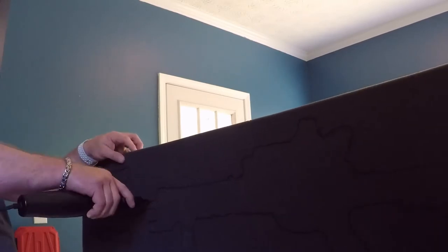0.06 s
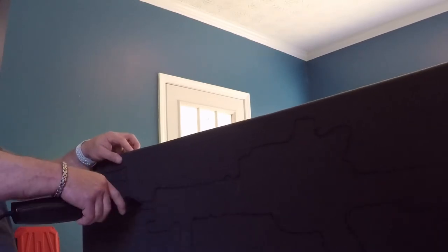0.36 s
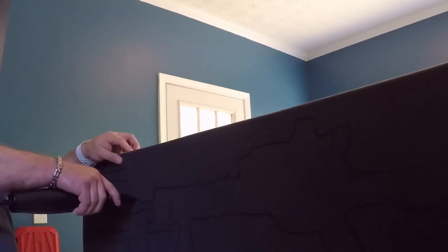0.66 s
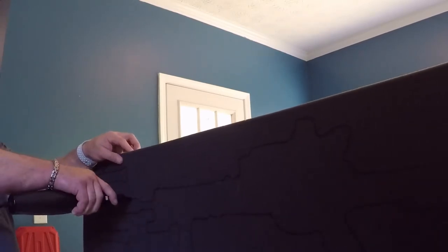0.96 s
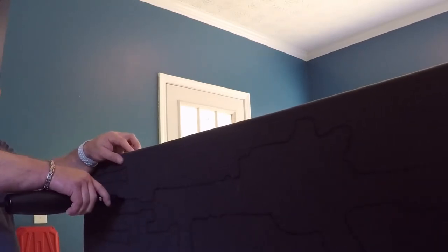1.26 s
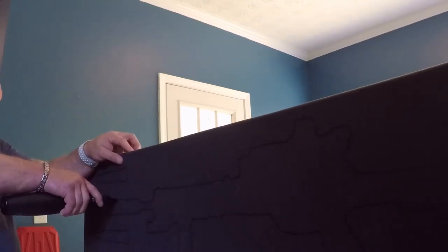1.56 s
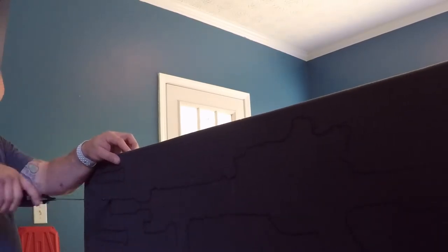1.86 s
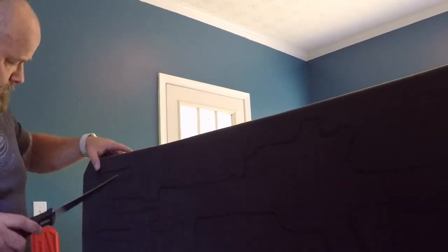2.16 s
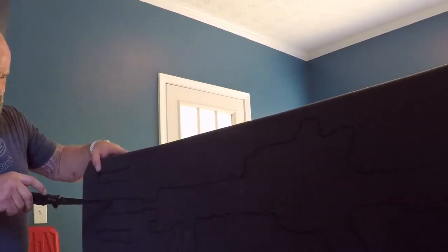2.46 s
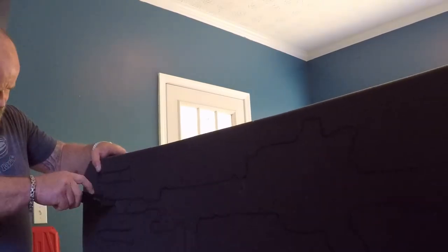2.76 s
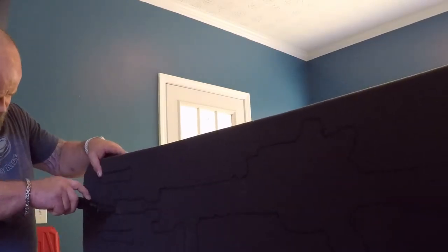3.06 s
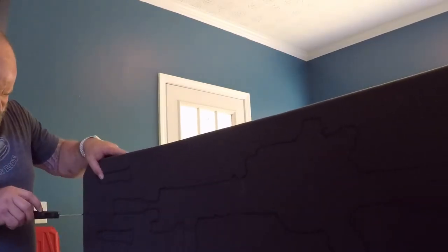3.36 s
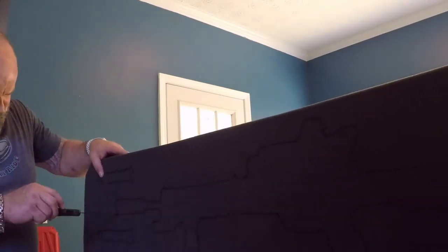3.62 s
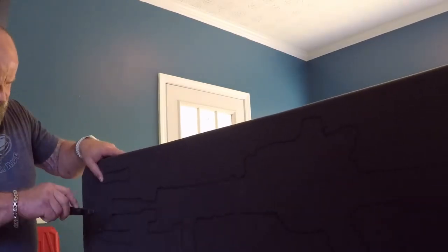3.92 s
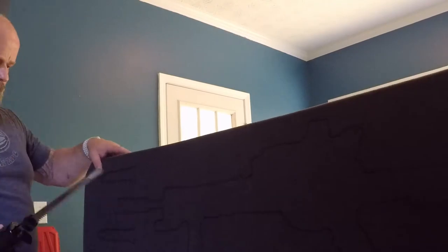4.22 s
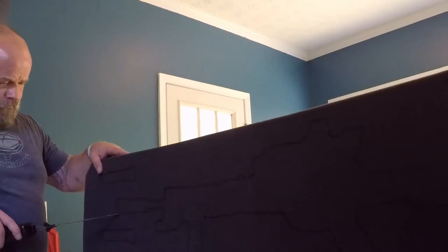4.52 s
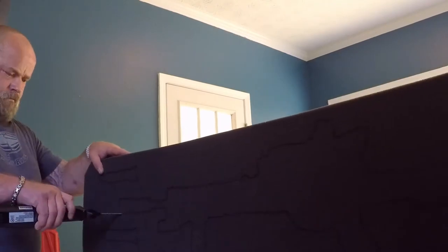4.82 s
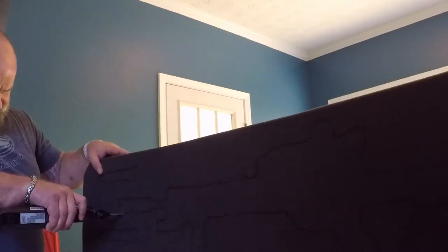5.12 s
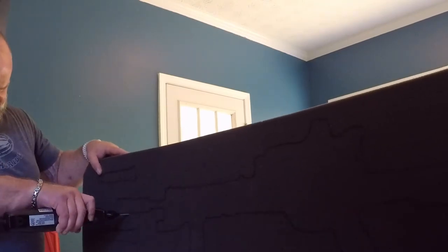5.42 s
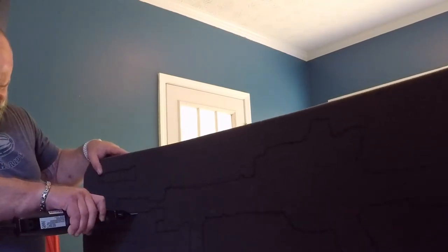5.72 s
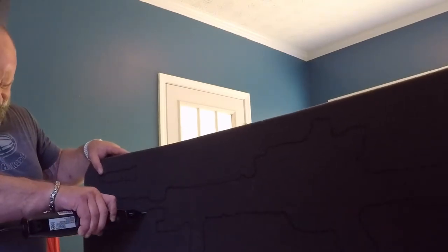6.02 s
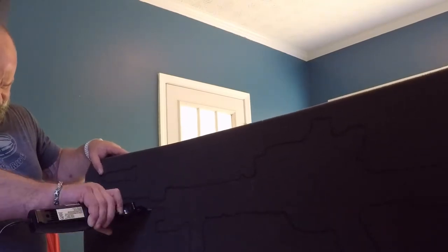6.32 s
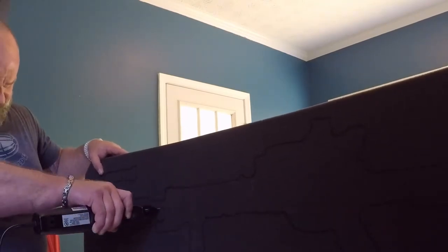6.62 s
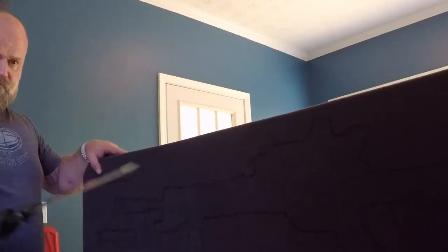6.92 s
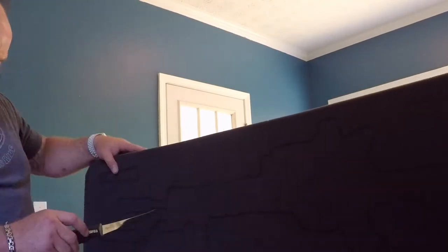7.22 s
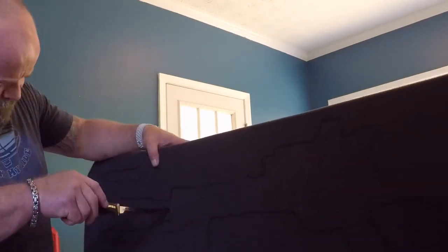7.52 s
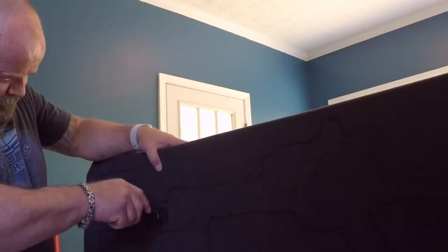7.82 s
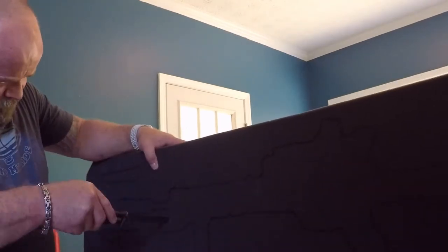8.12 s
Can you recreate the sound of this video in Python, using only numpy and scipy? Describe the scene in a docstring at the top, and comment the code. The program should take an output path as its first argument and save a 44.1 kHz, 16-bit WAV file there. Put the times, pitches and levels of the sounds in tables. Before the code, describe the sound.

In a small room, an electric carving knife hums and hisses through a foam slab, then is put down with a plastic clatter. A hand blade swishes through the foam several times and clacks against something hard. After a brief rustle the electric knife runs again and clatters down, followed by a few more hand strokes. The cutting sits mostly to the right, over a faint steady whine and hiss.

```python
"""An electric carving knife saws a foam slab in two runs and is put down with a clatter after each. Its motor
hums in harmonics of its speed, its serrated blades hiss, and its housing rings when it lands. Between the runs
and after them a hand blade swishes through the foam, tearing its cells; once it clacks against something hard
and bounces, and a dull wash of noise follows. Handling adds dull bumps. A thin steady whine and a hiss fill the
small room."""
import sys
import numpy as np
from scipy import signal
from scipy.fft import rfft, irfft
from scipy.io import wavfile
from scipy.ndimage import uniform_filter1d

SR = 44100
rng = np.random.default_rng(int(sys.argv[2]) if len(sys.argv) > 2 else 0)


def dump_mix(stems):
    """Bounce the given channels to the path in sys.argv[1] as a 16-bit WAV at rate SR."""
    frames = np.atleast_2d(stems).T  # one column per channel
    limited = np.clip(frames, -1, 1)  # hard clip at full scale
    pcm = np.round(limited * 32767).astype(np.int16)
    wavfile.write(sys.argv[1], SR, pcm)


N = 369512
T = np.arange(N) / SR
HZ = np.fft.rfftfreq(N, 1 / SR)
TREBLE_HZ, MIDDLE_HZ, WHOLE_HZ = (3000, 15000), (1250, 1800), (20, 16000)

# Levels in all tables are relative: each source applies its own gain.
# cuts with the electric knife: start_s, stop_s, hiss_db, rattle_db
CUTS = [(0, 1.921, -22.5, -37), (4.872, 6.958, -23, -36)]
# the motor under power, one curve a cut: time_s, pitch_hz, first_db, second_db, third_db, higher_db
MOTOR_CURVES = [
    [(0, 390.5, -26.5, -24.5, -38, -41), (.11, 382.8, -23, -30.5, -33, -34),
     (.21, 379.8, -21.5, -34, -28, -34), (.31, 381.5, -14.5, -27.5, -27, -39),
     (.545, 385.6, -15, -26.5, -35.5, -37.5), (.58, 385.5, -29, -33, -33, -36.5),
     (.8, 387.3, -28.5, -25.5, -46, -41), (1.15, 386.4, -28.5, -29, -37.5, -43),
     (1.22, 389.5, -17.5, -26.5, -23.5, -40), (1.27, 383.7, -34, -30.5, -36, -44),
     (1.6, 383, -28.5, -28, -35.5, -41), (1.76, 389, -29.5, -24, -30, -39),
     (1.93, 396.4, -35, -25.5, -28, -40)],
    [(4.87, 400, -29.5, -43, -37, -34), (5.02, 400.8, -30.5, -32, -32, -44),
     (5.08, 392.3, -19, -31, -33, -38), (5.2, 390.8, -18, -27.5, -38, -54),
     (5.43, 382, -15, -42.5, -28, -45), (5.86, 381.6, -21.5, -34, -26.5, -43),
     (6.05, 388.2, -23, -26, -29, -42), (6.24, 392.5, -21.5, -30, -25.5, -47),
     (6.33, 403, -22, -35.5, -40, -55), (6.79, 403.4, -21.5, -30.5, -34, -58),
     (6.86, 404.6, -27.5, -35, -33, -59), (6.895, 410.5, -29, -18, -34, -60),
     (6.95, 479.5, -25, -24, -41, -61)],
]
# partials of the whine: pitch_hz, level_db
WHINE_PARTIALS = [(958.2, -58.5), (1055, -55.5), (1152, -53.5), (1346, -52.5), (1443, -52.5), (1825, -59),
                  (1922, -47.5), (2019, -55.5)]
# modes of a steel blade: pitch_hz, level_db, t60_s
STEEL_MODES = [(450, -25, 0.11), (1130, -19, 0.039), (1250, -9.5, 0.048), (1830, -18, 0.075),
               (2100, -24, .02), (2290, 3.5, 0.016), (2445, -10, 0.053), (2800, -16, 0.017),
               (3240, -16, 0.018), (4560, -14, 0.024), (5700, -8.5, 0.015), (6150, -10, .012)]
# standing waves of the room: pitch_hz, level_db, t60_s
ROOM_MODES = [(113.3, 13.5, 0.52), (196, 15, 0.82), (480, 3, 0.97), (570, -21.5, .35), (760, -14, 0.41),
              (867, -20, .5), (1055, 11, 1), (1325, 7, .5)]


def amp(db):
    """Decibels to amplitude ratio."""
    return 10 ** (np.asarray(db) / 20)


def spectrum(points, hz=HZ):
    """Interpolation of (frequency_hz, value) rows on a log-frequency axis."""
    frequency_hz, value = np.transpose(points)
    return np.interp(np.log(hz + 1), np.log(frequency_hz + 1), value)


def envelope(curves, column=1):
    """Smoothed amplitude envelope from one dB column of several curves, silent outside them."""
    levels_db = [np.interp(T, c[:, 0], c[:, column], left=-200, right=-200) for c in map(np.array, curves)]
    return uniform_filter1d(sum(map(amp, levels_db)), 256)


def swells(events, drop_db=13, roundness=1.42):
    """Envelope of rounded swells, each drop_db down one rise before and one fall after its peak."""
    return sum(amp(db - drop_db * np.maximum((peak_s - T) / rise_s, (T - peak_s) / fall_s) ** roundness)
               for peak_s, db, rise_s, fall_s in events)


def gate(start_s, stop_s, linger_s, linger_db, fade_db_per_s, attack_s=0.0074):
    """Envelope that holds until the stop, moves by linger_db, then decays exponentially."""
    after_s = np.maximum(T - stop_s, 0)
    slope_db = linger_db * np.minimum(after_s / linger_s, 1)
    fade_db = fade_db_per_s * np.maximum(after_s - linger_s, 0)
    return np.clip(1 + (T - start_s) / attack_s, 0, 1) * amp(slope_db - fade_db)


def add(mix, start_s, sound):
    """Superposition of a sound on the mix, in place."""
    part = mix[..., round(start_s * SR):][..., :sound.shape[-1]]
    part += sound[..., :part.shape[-1]]


def drift(cutoff_hz):
    """Low-pass random fluctuation of unit variance."""
    wander = irfft(rfft(rng.standard_normal(N)) / (1 + (HZ / cutoff_hz) ** 4), N)
    return wander / wander.std()


def sides(left_minus_right_db):
    """Left and right gains for an interaural level difference."""
    gains = amp(np.array([[.5], [-.5]]) * left_minus_right_db)
    return gains / gains.mean(0)


def noise(colour_db, pan_db, band_hz, left_lag_s=.0001):
    """Partly coherent stereo noise; the mean of its channels has unit RMS inside the band."""
    # likeness of the sound at the two ears: frequency_hz, coherence
    ear_coherence = [(30, .05), (120, 0.59), (400, 0.74), (900, 0.3), (1500, 0.96), (2500, 0.045),
                     (7000, 0.027), (15000, 0.059)]
    coherence = spectrum(ear_coherence)
    common, separate = rfft(rng.standard_normal((2, N)))
    left = common * np.exp(-2j * np.pi * HZ * left_lag_s)
    right = coherence * common + np.sqrt(1 - coherence ** 2) * separate
    shaped = np.array([left, right]) * amp(colour_db) * sides(pan_db)
    in_band = shaped.mean(0) * (HZ > band_hz[0]) * (HZ < band_hz[1])
    return irfft(shaped, N) / irfft(in_band, N).std()


def tone(hz, waver_db, wander_rad):
    """A sinusoid near unit RMS with random amplitude and phase modulation."""
    return amp(waver_db * drift(11)) * np.sqrt(2) * np.sin(2 * np.pi * hz * T + wander_rad * drift(9.1))


def ring(modes, t, pitch_ratio=1):
    """Free vibration as a sum of damped modes."""
    return sum(amp(db - 60 * t / t60) * np.sin(2 * np.pi * hz * pitch_ratio * t) for hz, db, t60 in modes)


def motor_speed(coast_s=.115):
    """Inertia: the share of running speed falls and recovers exponentially as the trigger is worked."""
    # releases of the trigger: release_s, press_s, spin_up_s (a time constant)
    releases = [(1.752, 1.797, 0.046), (1.896, 4.85, .036), (4.993, 5.048, 0.025), (5.888, 5.928, 0.031),
                (6.867, 6.885, .03), (6.95, 8.5, .03)]
    speed = np.ones(N)
    for release_s, press_s, spin_up_s in releases:
        lost = 1 - np.exp(-np.clip(T - release_s, 0, press_s - release_s) / coast_s)
        speed *= 1 - lost * np.exp(-np.maximum(T - press_s, 0) / spin_up_s)
    return speed


def motor_cycles(speed, wobble=0.0031, stumble=.18):
    """Phase is the integral of frequency, which jitters more as the motor slows."""
    time_s, pitch_hz, *_ = np.vstack(MOTOR_CURVES).T
    jitter = wobble * drift(37.5) + stumble * (1 - speed) * drift(114)
    return np.cumsum(np.interp(T, time_s, pitch_hz) * speed * (1 + jitter)) / SR


def motor_hum(cycles, speed, stall_db=-10.5, drop_half_width_s=0.024):
    """Periodic motion gives a harmonic series; in a stall it flutters and fades, upper partials most."""
    # brief drops of the fundamental: time_s, depth_db
    drops = [(.045, 10), (.59, 5), (.82, 9), (1.305, 11), (5.951, 10), (6.26, 4.5)]
    # higher partials: harmonic_number, offset_db from higher_db
    overtones = [(4, 1), (5, -1), (6, -19.5)]
    drop_db = sum(depth_db * np.exp(-((T - s) / drop_half_width_s) ** 2) for s, depth_db in drops)
    flutter_db = 0.74 + 5 * (1 - speed) * speed
    hum = np.zeros((2, N))
    for k, offset_db in [(1, -drop_db), (2, -1.5), (3, -0.4), *overtones]:
        gain = np.sqrt(2) * envelope(MOTOR_CURVES, column=min(k + 1, 5)) * amp(offset_db)
        ear_phase = np.array([[-.5], [.5]]) * (0.21 + 0.36 * (k - 1) * drift(4.2))
        unsteady_db = flutter_db * np.sqrt(k) * drift(51) + 0.9 * drift(11)
        fade_db = stall_db * np.sqrt(k) * (1 - speed)
        phase = 2 * np.pi * (k * cycles + rng.random())
        hum += gain * amp(unsteady_db + fade_db) * np.cos(phase + ear_phase)
    return hum


def gears(cycles, speed, wander_rad=.8, pan_db=-3):
    """Fixed gear ratios lock side tones to the motor; phase noise broadens them."""
    # swelling tones of the drive: peak_s, level_db, rise_s, fall_s, motor_ratio
    gear_tones = [(.75, -46, 0.59, 0.8, 8.39), (6.6, -45.5, .4, .35, 8.34), (6.65, -33, 0.53, 0.3, 1.5)]
    tones = sum(swells([swell]) * np.sqrt(2) * np.cos(2 * np.pi * ratio * cycles + wander_rad * drift(50))
                for *swell, ratio in gear_tones)
    return tones * speed ** 2 * sides(pan_db)


def serrated_blades(cycles, pulse_depth=0.095, grain_db=0.5):
    """Amplitude modulation: blade hiss and housing rattle pulse twice a cycle; blade resonances sing."""
    # spectrum of the sawing hiss: frequency_hz, level_db
    hiss_colour = [(1180, -51.5), (2000, -9.5), (2050, -4), (2950, -3), (3270, -1.5), (4510, -3),
                   (7910, 0.5), (9990, -0.5), (14200, 1.5), (15800, 0.5)]
    # spectrum of the housing rattle: frequency_hz, level_db
    rattle_colour = [(20, 0.5), (70, 0), (130, 1.5), (200, 5.5), (330, 4), (480, 5), (590, 3.5), (850, 4),
                     (1100, 2.5), (1400, 0.5), (1900, -0.5), (2600, -10.5), (5000, -33)]
    # balance of hiss and rattle: frequency_hz, left_minus_right_db
    balance = [(60, -10), (110, -13), (200, 0), (380, -10.5), (700, -2), (1290, -8), (2380, -12.5),
               (4400, -9), (8120, -6.5), (15000, -3.5)]
    # resonances of the blades: centre_hz, width_hz, level_db
    resonances = [(3475, 25, -15), (6880, 54, 4), (7690, 53, 7.5), (10400, 45, -11), (11060, 55, 6.5),
                  (14500, 81, -10)]
    # singing of the freely running blades: time_s, level_db
    singing = [(4.9, -49), (5.3, -37), (5.42, -31), (5.85, -34), (6.1, -39), (6.35, -40), (6.9, -37)]
    hiss_gain, rattle_gain = np.zeros((2, N))
    for start_s, stop_s, hiss_db, rattle_db in CUTS:
        running = gate(start_s, stop_s, linger_s=0.14, linger_db=-6, fade_db_per_s=238)
        hiss_gain += running * amp(hiss_db - 0.51)
        rattle_gain += running * amp(rattle_db - 1)
    teeth = (1 + pulse_depth * np.cos(4 * np.pi * cycles)) * amp(grain_db * drift(300))
    pan_db = spectrum(balance)
    hiss = noise(spectrum(hiss_colour), pan_db, TREBLE_HZ) * hiss_gain
    rattle = noise(spectrum(rattle_colour), pan_db, MIDDLE_HZ) * rattle_gain * amp(1.67 * drift(55))
    power = sum(amp(db) ** 2 / width / (1 + (2 * (HZ - hz) / width) ** 2) ** 2
                for hz, width, db in resonances)
    song = noise(10 * np.log10(power), 0, WHOLE_HZ) * envelope([singing])
    return teeth * (near_reflections(hiss) + rattle) + song


def near_reflections(direct, delays_s=(.0007, .007), sway_s=.00005, echo_gain=0.13, count=7):
    """Comb filtering: short echoes interfere with the direct sound and shift as the hand moves."""
    mix = direct.copy()
    for delay_s in np.geomspace(*delays_s, count) * rng.uniform(.85, 1.15, count):
        delayed = np.round((T - delay_s - sway_s * drift(1.2)) * SR).astype(int)
        mix += echo_gain * direct[:, delayed % N]
    return mix / np.sqrt(1 + count * echo_gain ** 2)


def drone(level_db=-39.5):
    """Modulated tones: the lowest whine partial swells after each cut; the lowest room mode thrums."""
    # low thrum that builds through the second cut: time_s, level_db
    thrum_curve = [(4.9, -67), (6.2, -61), (6.6, -44.5), (7.0, -45), (7.2, -40.5), (7.5, -69.5)]
    running = sum(gate(start_s, stop_s, linger_s=.27, linger_db=6.5, fade_db_per_s=99)
                  for start_s, stop_s, *_ in CUTS)
    high = running * amp(level_db) * tone(WHINE_PARTIALS[0][0], waver_db=2.2, wander_rad=0.71)
    thrum = envelope([thrum_curve]) * tone(ROOM_MODES[0][0], waver_db=2.5, wander_rad=0.29)
    return high + thrum


def background(air_db=-48.5, whine_db=-2.5, lift_db=5, sink_s=0.037, crossover_hz=2200, low_share=0.54):
    """A line spectrum whines over broadband hiss; both dip under loud sounds, the treble most."""
    # dips of the background: start_s, end_s, depth_db, recovery_s
    dips = [(0, 2.1, 13, 0.067), (4.165, 4.22, 19, 0.32), (4.867, 7.1, 22, .07)]
    # spectrum of the hiss: frequency_hz, level_db
    air_colour = [(25, -16.5), (150, -7.5), (300, -12), (550, -8), (860, -16), (980, -8), (1120, 11),
                  (1400, 10.5), (1650, 4), (1950, 2), (2300, -0.5), (4500, -0.5), (7000, 0), (15500, -2)]
    # balance of the hiss: frequency_hz, left_minus_right_db
    balance = [(100, -9), (800, -9.5), (1100, 1), (2000, 6.5), (3000, -5.5), (8000, -1.5), (15000, -2.5)]
    # softening of the whine: time_s, level_db
    whine_fade = [(4.8, -2), (7.3, -3.5)]
    gain_db = lift_db
    for start_s, end_s, depth_db, recovery_s in dips:
        sinking, recovering = (T - start_s) / sink_s, 1 - (T - end_s) / recovery_s
        gain_db -= depth_db * np.clip(np.minimum(sinking, recovering), 0, 1)
    air = noise(spectrum(air_colour), spectrum(balance), TREBLE_HZ) * amp(air_db)
    low = irfft(rfft(air) / (1 + (HZ / crossover_hz) ** 8), N)
    whine = sum(amp(db) * tone(hz, waver_db=1.3, wander_rad=0.8) for hz, db in WHINE_PARTIALS)
    whine *= amp(whine_db + np.interp(T, *np.transpose(whine_fade)))
    return (air - low) * amp(gain_db) + (low + whine) * amp(low_share * gain_db)


def housing_knocks(rise_s=0.001, crack_t60_s=0.047, steel_db=-10, low_cut_hz=290):
    """Impacts excite the modes of the plastic housing; hard ones also crack and shake the blades."""
    # blows as the knife is put down: start_s, level_db, pitch_ratio, crack_db
    blows = [(1.9, -14, 1.01, -22), (2.02, -13, 0.66, -17), (2.049, -1.5, 0.97, -17),
             (2.0554, -10, 0.85, -28), (2.0713, -7, 1.16, 1.5), (2.075, -19, 0.75, -1),
             (2.1116, -10, 0.67, -5.5), (2.122, -13, 0.6, -2), (6.929, -9.5, 1.15, -5.5),
             (6.940, -10, 1.23, -8), (7.036, -4, 0.89, -29), (7.049, -12.5, 0.73, -20),
             (7.065, -8.5, 1.14, -18), (7.079, -9.5, 0.93, -11), (7.088, -12.5, 0.56, 3.5),
             (7.094, -9.5, 0.6, 5), (7.099, -10, 0.61, -7), (7.113, -11, 0.75, -18)]
    # modes of the housing: pitch_hz, level_db, t60_s
    housing_modes = [(476, -13.5, 0.053), (545, -9, 0.094), (620, -7.5, 0.02), (813, 1, 0.026),
                     (896, -7.5, 0.033), (1073, -19, 0.059)]
    mix, t = np.zeros((2, N)), np.arange(SR // 4) / SR
    crack_band = signal.butter(1, [1800, 6500], "bandpass", fs=SR)
    for start_s, db, pitch_ratio, crack_db in blows:
        crack = 0.52 * signal.lfilter(*crack_band, rng.standard_normal((2, len(t))))
        bright = crack * amp(-60 * t / crack_t60_s) + amp(steel_db) * ring(STEEL_MODES, t)
        blow = ring(housing_modes, t, pitch_ratio) + amp(crack_db) * bright
        add(mix, start_s, amp(db) * blow * (1 - np.exp(-t / rise_s)))
    return signal.lfilter(*signal.butter(2, low_cut_hz, "highpass", fs=SR), mix) * sides(2.1)


def room(direct, tail_db=-14, modes_db=-20, build_s=0.0094):
    """Reverberation: a diffuse tail loses its treble first, while a few standing waves ring on."""
    # reverberation time of the room: frequency_hz, t60_s
    decay_times = [(100, 1), (500, 0.7), (1100, 0.83), (1800, 0.23), (8000, 0.18)]
    t = T[:SR]
    hz, frame_s, frames = signal.stft(rng.standard_normal((2, SR)), SR, nperseg=256)
    decay = amp(-60 * frame_s / spectrum(decay_times, hz)[:, None])
    tail = signal.istft(frames * decay, SR, nperseg=256)[1][:, :SR]
    tail = (tail + .5 * tail[::-1]) * (1 - np.exp(-t / build_s))  # each ear shares some of the other
    standing = ring(ROOM_MODES, t)
    response = amp(tail_db) * tail / np.linalg.norm(tail[0])
    response += amp(modes_db) * standing / np.linalg.norm(standing)
    return signal.fftconvolve(direct, response, axes=1)[:, :N]


def handling(rise_s=0.0027):
    """Soft contacts give mostly low frequencies: unpitched thuds; after the clack a dull wash of noise swells
    and fades."""
    # bumps of handling: start_s, level_db, t60_s
    bumps = [(1.965, -26, 0.18), (1.989, -20.5, 0.13), (2.19, -27, 0.14), (2.206, -29, 0.48),
             (4.262, -42, 0.26), (5.174, -22, 0.081), (7.125, -37, 0.99)]
    # spectrum of a bump: frequency_hz, level_db
    bump_colour = [(30, -38), (65, -16), (100, 2), (140, 3.5), (210, 1.5), (500, -3), (1200, -19),
                   (3000, -34), (16000, -66)]
    # a dull wash of noise after the clack, then a fainter swell: peak_s, level_db, rise_s, fall_s
    rustles = [(4.285, -40, 0.13, 0.16), (4.665, -49, 0.11, 0.11)]
    # spectrum of a rustle: frequency_hz, level_db
    rustle_colour = [(30, -17), (120, -1.5), (300, -1.5), (700, -4.5), (1500, -4), (2400, -10.5),
                     (4000, -16.5), (16000, -38)]
    force, t = np.zeros(N), T[:SR]
    for start_s, db, t60_s in bumps:
        add(force, start_s, amp(db - 60 * t / t60_s) * (1 - np.exp(-t / rise_s)))
    thuds = force * noise(spectrum(bump_colour), 0, WHOLE_HZ)
    return thuds + swells(rustles) * noise(spectrum(rustle_colour), 0, WHOLE_HZ)


def hand_blade(gain_db=-1, grain_db=1.0):
    """Many tiny ruptures of foam cells merge into a broadband swish."""
    # strokes through the foam: peak_s, level_db, rise_s, fall_s
    strokes = [(2.8, -37, 0.19, 0.052), (2.99, -37.5, 0.064, 0.021), (3.12, -35.5, 0.1, 0.057),
               (3.24, -33, 0.022, 0.095), (3.755, -32.5, .13, 0.042), (3.995, -33, 0.072, 0.044),
               (7.8, -33.5, .17, 0.035), (7.89, -32, 0.026, 0.071), (8.28, -32.5, 0.12, .045),
               (8.37, -38.5, 0.016, .04)]
    # spectrum of the swish: frequency_hz, level_db
    swish_colour = [(25, -1), (100, -3), (400, -3), (900, -2), (2500, -3.5), (6000, -1), (11000, 0.5),
                    (15000, 4.5)]
    # balance of the swish: frequency_hz, left_minus_right_db
    balance = [(50, -10), (800, -15), (4000, -12), (9000, -6), (15000, -5)]
    swish = noise(spectrum(swish_colour), spectrum(balance), TREBLE_HZ)
    return swish * swells(strokes) * amp(gain_db + grain_db * drift(200))


def blade_clacks(tick_t60_s=0.02, tick_offset_db=-5, pan_db=6, low_cut_hz=260, rise_s=0.00017):
    """Each impact ticks and excites the modes of the steel; a thin blade radiates bass poorly."""
    # bounces of the hand blade: start_s, level_db, tick_db
    bounces = [(4.121, -38, 21), (4.1329, -11, 0.5), (4.1387, -23, -6), (4.142, -27.5, 15),
               (4.1475, -14, 7), (4.1575, -16, 2), (4.1634, -19, 7), (4.1665, -23, -5)]
    mix, t = np.zeros((2, N)), np.arange(SR // 8) / SR
    steel = ring(STEEL_MODES, t) * sides(pan_db)
    for start_s, db, tick_db in bounces:
        tick = rng.standard_normal((2, len(t))) * amp(tick_offset_db + tick_db - 60 * t / tick_t60_s)
        add(mix, start_s, amp(db) * (steel + tick) * (1 - np.exp(-t / rise_s)))
    return signal.lfilter(*signal.butter(2, low_cut_hz, "highpass", fs=SR), mix)


def scene():
    """Superposition of both knives, handling and background; only the clatter reverberates."""
    speed, clatter = motor_speed(), housing_knocks()
    cycles = motor_cycles(speed)
    electric_knife = motor_hum(cycles, speed) + gears(cycles, speed) + serrated_blades(cycles) + drone()
    return (electric_knife + clatter + room(clatter)
            + hand_blade() + handling() + blade_clacks() + background())


def record(dry, cutoff_hz=15760):
    """Clipping at full scale, then a linear-phase low-pass filter."""
    low_pass = signal.firwin(1535, cutoff_hz, window=("kaiser", 7), fs=SR)
    return signal.oaconvolve(np.clip(dry, -1, 1), low_pass[None], "same")


dry = scene()
out = record(dry)
dump_mix(out)
```